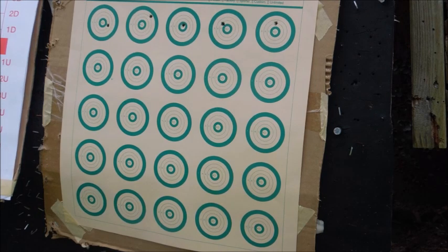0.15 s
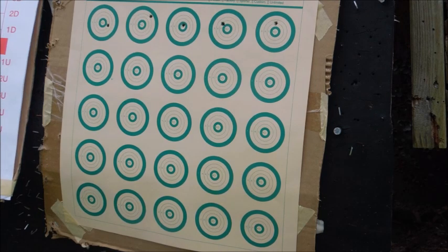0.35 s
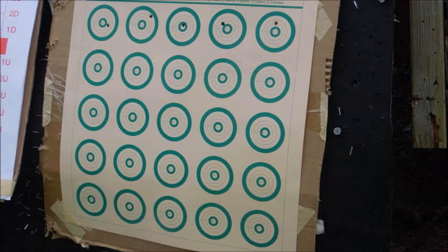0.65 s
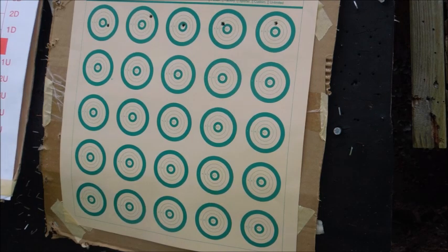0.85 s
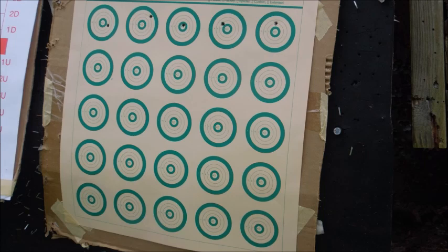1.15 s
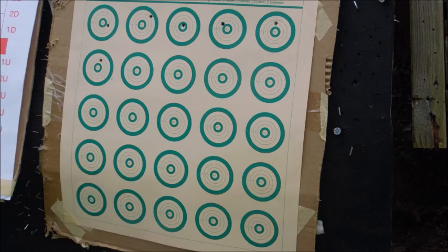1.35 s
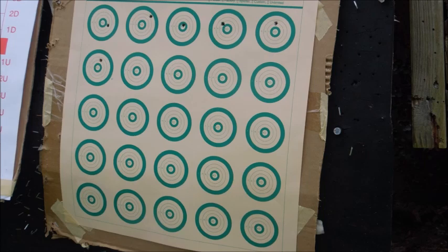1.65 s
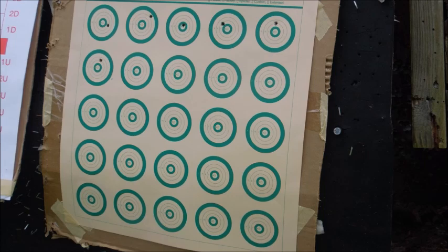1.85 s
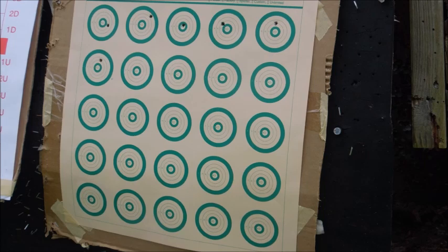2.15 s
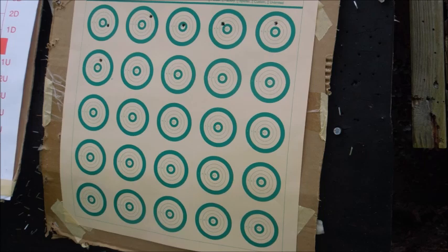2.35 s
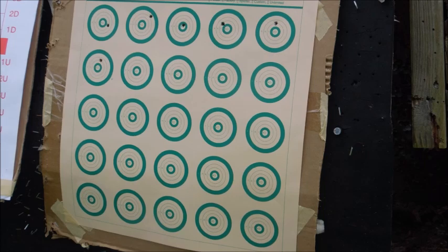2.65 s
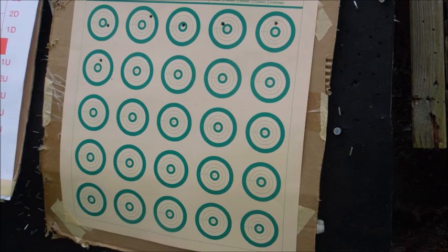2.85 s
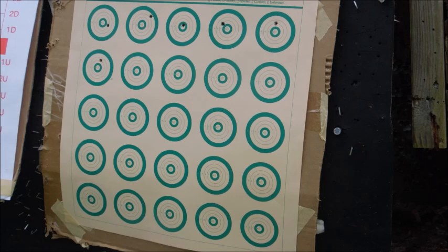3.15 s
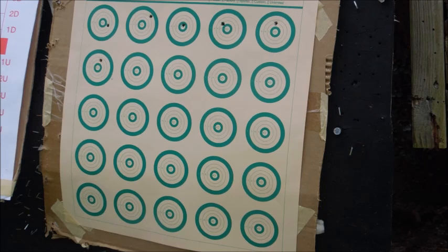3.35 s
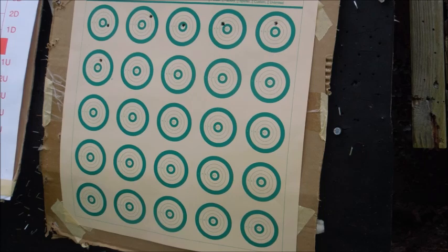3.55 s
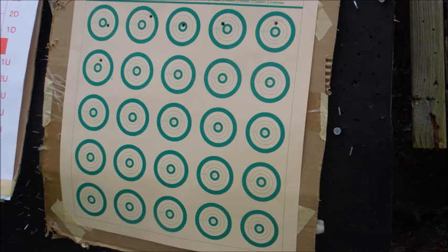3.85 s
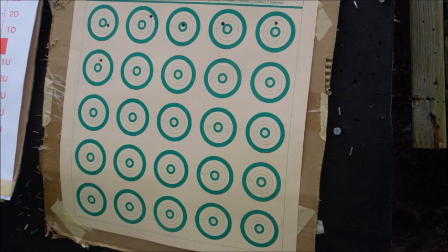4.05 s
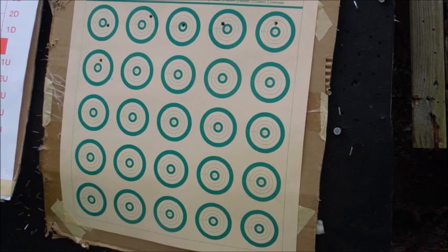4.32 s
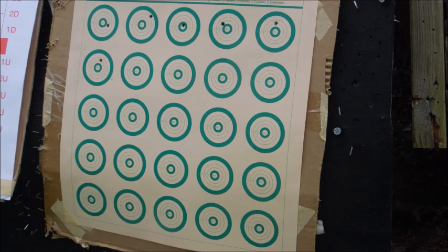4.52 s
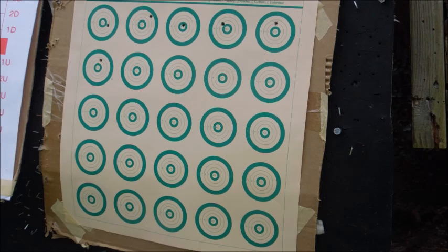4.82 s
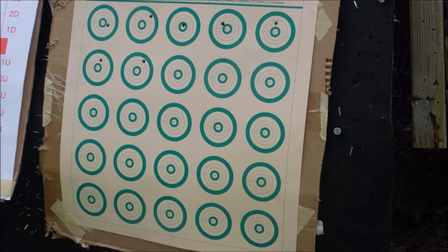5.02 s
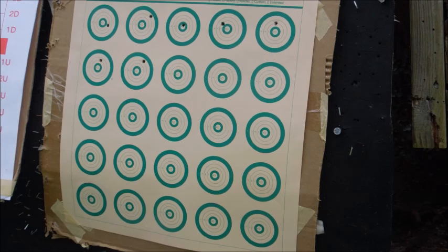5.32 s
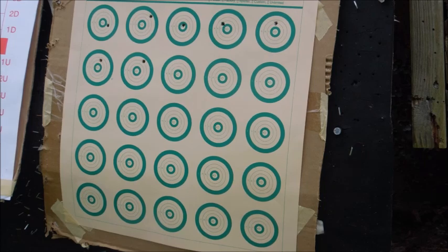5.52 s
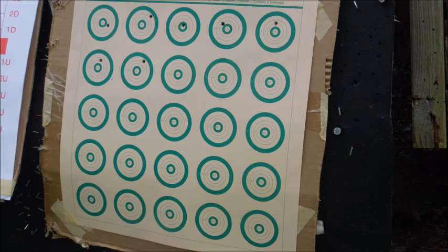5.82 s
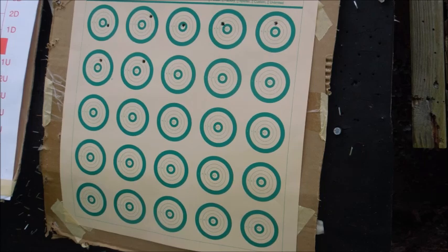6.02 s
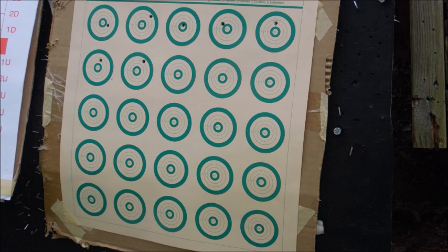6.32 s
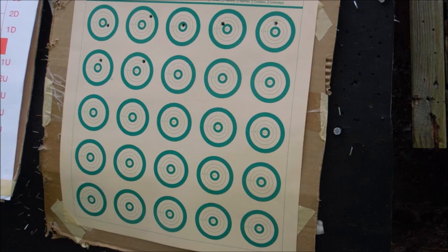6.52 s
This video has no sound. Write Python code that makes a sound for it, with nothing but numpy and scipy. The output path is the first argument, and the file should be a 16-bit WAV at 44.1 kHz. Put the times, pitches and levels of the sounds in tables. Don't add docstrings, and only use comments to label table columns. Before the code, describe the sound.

Two pellets crack hard into a paper target beside the microphone, echoing off nearby trees, while crickets chirp and gusty wind rumbles between brief dropouts.

```python
import sys
import numpy as np
from scipy import signal
from scipy.fft import rfft, irfft, next_fast_len
from scipy.io import wavfile
from scipy.ndimage import uniform_filter1d, map_coordinates

SR = 44100
rng = np.random.default_rng(int(sys.argv[2]) if len(sys.argv) > 2 else 0)


def generate_wav(signal):
    frames = np.transpose(np.atleast_2d(signal))
    scaled = np.clip(frames, -1, 1) * 32767
    pcm = np.round(scaled).astype(np.int16)
    wavfile.write(sys.argv[1], SR, pcm)


def attenuation_scalar(level_db):
    decades = np.asarray(level_db, float) / 20
    return 10 ** decades


N = 294579
T = np.arange(N) / SR

# start in seconds, end in seconds.
VIEWS = [(0, .687), (.7495, 2.422), (2.487, 3.89), (3.955, 6.561), (6.624, 6.7)]
# start in seconds, length in seconds.
FADES = [(.7495, 0.62), (2.487, 0.5), (3.955, 0.98), (6.624, 1)]
DUCK_DB, DUCK_HOLD_S, DUCK_RELEASE_S = -4.5, .55, .27

# frequency in Hz, level in dB.
RUMBLE = [(8, -30.5), (25, -0.5), (45, 0.5), (85, -7.5), (130, -38), (400, -120)]
FLUTTER = [(40, -120), (70, -6.5), (100, -1.5), (150, -4), (220, -10), (320, -20.5), (500, -38.5),
           (1200, -120)]
# start in seconds, level in dB, flutter over rumble in dB.
BREEZE = [(0, -42, -7.5), (.53, -44.5, -8.5), (.72, -50, -2), (1.47, -47, -4), (2.45, -45.5, -8),
          (3.93, -41.5, -9.5), (5.1, -34, -5), (5.6, -43, -8), (6.6, -55, -10)]
BREEZE_PAN_DB = 2
# start in seconds, hold in seconds, level in dB, flutter over rumble in dB, left over right in dB.
GUSTS = [(.0, .08, -37.5, -3.5, -8.5), (0.155, .1, -35.5, -8, 12), (.36, .14, -38, -9, 3),
         (2.63, .1, -42.5, 4.5, 7.5), (2.78, 0.44, -39, -4, 2.5), (3.26, .1, -42.5, 4, 3),
         (3.411, .06, -32.5, -5, 12), (3.598, .05, -40.5, -3, 9.5), (4.44, .04, -41.5, 3, 5.5),
         (4.515, 0.028, -38.5, 2.5, 5), (4.685, .21, -37.5, 4.5, 4.5), (4.92, .06, -39.5, -8.5, 2.5),
         (5.45, .06, -37, -6.5, 8), (6.053, 0.026, -43, 5, 11), (6.163, .04, -42.5, -6.5, 9),
         (6.4, .145, -44, 8, -0.5)]
GUST_RISE_DB_PER_S, GUST_FALL_DB_PER_S = 500, 260.5
# centre in seconds, pitch in Hz, level in dB, half length in seconds.
EDDIES = [(2.632, 187, -23, 0.0095), (2.698, 145.3, -35, 0.046), (2.78, 130.2, -32, .04),
          (2.87, 125.8, -27, 0.033), (3.004, 104.2, -33, 0.079), (3.154, 137.9, -29, 0.031),
          (3.336, 127.1, -33.5, 0.042), (3.447, 109.6, -21, 0.014), (3.618, 137.4, -36.5, 0.033)]

# frequency in Hz, level in dB.
ECHO_LOW = [(300, -120), (500, -21.5), (1100, -11), (1900, -2.5), (3100, -0.5), (3800, -10), (4500, -39),
            (8000, -120)]
ECHO_LATE = [(300, -120), (500, -18.5), (1100, -4.5), (2100, -2.5), (2900, -7.5), (3700, -15), (4500, -44),
             (8000, -120)]
ECHO_MIDDLE = [(2500, -120), (3800, -8), (4500, 0), (6200, -1), (7600, -7), (8800, -12), (12000, -120)]
ECHO_HIGH = [(6000, -120), (8200, -4), (9500, 2.5), (13000, -4.5), (20000, -13.5)]
# shot in seconds, level in dB, cut in seconds.
ANSWERS = [
    (-1.03, -1.5, .7),
    (1.45, 0, 2.44),
    (5.0783, -1, 6.58),
]
TRAP_S, TRAP_RISE_S, TRAP_HOLD_S, TRAP_FALL_DB_PER_S = .063, .028, .029, 285
TREES_S = .19
# trap in dB, trees in dB, trees rise in seconds, trees fall in dB per second.
VOICES = [
    (-23.5, -33, 0.062, 21.5),
    (-26.5, -36, 0.022, 46.5),
    (-24.5, -31.5, 0.033, 132.5),
]
# delay in seconds, level in dB, half length in seconds.
CLUMPS = [
    (0.303, 1, 0.012),
    (0.472, 1.5, 0.023),
    (0.388, -2, 0.053),
]

# frequency in Hz, level in dB.
CHOIR = [(5000, -120), (6200, -19), (6800, -6.5), (7500, -3), (8000, -2.5), (8600, -18.5), (10000, -120)]
# first chirp in seconds, last in seconds, period in seconds, pitch in Hz, level in dB.
FAR = [(.03, .69, .0353, 8150, -43), (.774, 1.46, .0345, 8240, -39.5), (2.078, 2.42, .035, 8230, -43),
       (2.511, 3.89, .0343, 8240, -39.5), (3.972, 5.08, .0341, 8240, -40.5),
       (6.022, 6.56, .0342, 8230, -43), (.012, .69, .0525, 7820, -41), (.76, 6.68, .0585, 7880, -46),
       (.02, 6.68, .047, 7150, -50)]
DUTY = .33
# frequency in Hz, level in dB.
AIR = [(100, -120), (250, -10.5), (400, -15.5), (600, -15.5), (1300, -19), (5700, -22), (9000, -21.5),
       (14000, -25.5), (20000, -28)]

# delay after the shot in seconds, peak in dB.
CLAPS = [(0.2741, -21), (.2945, -14), (.333, -23), (.408, -24), (.436, -24), (0.491, -25), (.517, -29),
         (.567, -27)]
CLAP_HZ, CLAP_T60 = 2160, .0069
# time in seconds, peak in dB, resonance in Hz.
CHIPS = [(1.5607, -14, 10500), (1.6672, -21, 6500), (1.67, -19, 5000), (1.6755, -19, 11500),
         (1.6793, -7, 10000), (1.6838, -8, 10000), (1.6865, -15, 7000), (1.6915, -17, 4500),
         (5.2868, -12, 7500), (5.2965, -17, 4000), (5.2925, -22, 8000), (5.296, -7, 10000),
         (5.3008, -10, 10000), (.445, -37, 4480), (.451, -31, 9500), (.453, -34, 3600), (.4545, -30, 10600),
         (.4577, -30, 9800)]
CHIP_T60 = .006
# time in seconds, peak in dB.
TICKS = [(.0965, -37), (.16, -40), (.368, -36), (.449, -24), (6.323, -33), (6.355, -41), (6.534, -41)]
TICK_HZ, TICK_T60 = 10700, .045
# time in seconds, peak in dB.
THUDS = [(1.68, -38), (1.93, -44), (5.18, -40), (5.29, -41), (4.455, -39), (4.52, -31), (4.705, -32),
         (6.075, -29.5), (6.445, -32)]
THUD_HZ, THUD_T60 = 208, .02

# first stroke in seconds, last in seconds, strokes, level in dB,
# share of strokes with a wing hitch.
NEAR = [(.819, 1.399, 9, -36.5, .15), (1.621, 2.3563, 11, -37, .7), (2.508, 2.7409, 4, -30.5, 0),
        (2.8148, 3.0396, 4, -30.5, 0), (3.1185, 3.421, 5, -30.5, .15), (3.4883, 3.8487, 6, -30.5, .15),
        (3.999, 4.4951, 8, -32, .25), (4.5663, 4.7151, 3, -31.5, .6), (4.7961, 5.0204, 4, -31, .6),
        (5.241, 5.8946, 10, -31, .6), (5.9677, 6.4845, 8, -30.5, .9)]
# time in seconds, pitch in Hz.
STROKE = [(0, 7450), (.006, 7620), (.013, 7630), (.018, 7400), (.024, 6980)]
NEAR_JITTER_S, HITCH_DB, SMOOTH_DB = .001, 16, 2

# contact in seconds, level in dB, air push delay in seconds,
# push width at left in seconds, push width at right in seconds.
SHOTS = [
    (1.4598, 0, .0172, .0108, .0046),
    (5.0783, 0, .0152, .0098, .0048),
]
# time after contact in seconds, level in dB.
CARD = [(0, -2.5), (.0025, 1), (.0035, -8.5), (.0045, 6.5), (.008, 2), (.01, -15.5), (.03, -7), (.045, -19),
        (.07, -35.5)]
SPRAY = [(0, -0.5), (.008, 2.5), (.017, 10), (.03, 10), (.04, -0.5), (.05, -11.5), (.06, -18), (.075, -30),
         (.1, -64)]
# centre in Hz, width in Hz, level in dB.
CARD_MODES = [
    (2750, 1000, -3.5),
    (1450, 900, -12.5),
    (300, 270, -10.5),
]
# frequency in Hz, level in dB.
SPRAY_COLOUR = [(100, -33), (300, -9), (700, -7.5), (1500, -4), (2800, -12.5), (4000, -7.5), (6000, -4.5),
                (8000, -1.5), (12000, 3), (20000, -2.5)]

# time in seconds, level in dB, spread in seconds.
CRACKLE = [(2.4595, -62, .0001), (2.4745, -52, .0001), (2.4793, -20, .0002), (2.4824, 6, .0003),
           (2.4852, 6, .0007), (2.4867, -5, .0008), (2.4882, 6, .0005), (2.4913, 6, .0005),
           (2.4941, 6, .00022)]


def unit(x):
    return x / np.sqrt(np.mean(x ** 2) + 1e-20)


def along(points, hz):
    f, v = np.transpose(points)
    return np.interp(np.log(hz + 1), np.log(f + 1), v)


def curves(rows, t=T):
    s, *cols = np.transpose(rows)
    return [np.interp(t, s, c) for c in cols]


def wobble(rate):
    knots = rng.standard_normal(int(N * rate / SR) + 4)
    return map_coordinates(knots, [T * rate])


def filtered(x, response):
    count = x.shape[-1]
    m = next_fast_len(count + min(count, SR))
    return irfft(rfft(x, m) * response(np.fft.rfftfreq(m, 1 / SR)), m)[..., :count]


def rush(spectrum, alike, count=N, alike_high=None):
    points = [(2500, alike), (11000, alike if alike_high is None else alike_high)]

    def response(hz):
        turn = np.arccos(np.clip(along(points, hz), -1, 1)) / 2
        return attenuation_scalar(along(spectrum, hz)) * [np.cos(turn), np.sin(turn)]

    mid, side = filtered(rng.standard_normal((2, count)), response)
    return unit(np.array([mid + side, mid - side]))


def add(track, s, sound):
    part = track[..., round(s * SR):][..., :sound.shape[-1]]
    part += sound[..., :part.shape[-1]]


def wind(gain_db):
    starts, levels, edges = np.transpose(BREEZE)
    now = np.searchsorted(starts, T, side="right").clip(1) - 1
    pan = attenuation_scalar([[BREEZE_PAN_DB / 2], [-BREEZE_PAN_DB / 2]])
    breeze = attenuation_scalar(levels[now] + gain_db + 2.2 * wobble(11)) * pan
    rumble = breeze ** 2
    flutter = (breeze * attenuation_scalar(edges[now])) ** 2
    for s, hold, db, edge_db, pan_db in GUSTS:
        rise_db = GUST_RISE_DB_PER_S * np.clip(s - T, 0, 1)
        fall_db = GUST_FALL_DB_PER_S * np.clip(T - s - hold, 0, 1)
        power = (attenuation_scalar(db - rise_db - fall_db) * attenuation_scalar([[pan_db / 2], [-pan_db / 2]])) ** 2
        rumble = rumble + power
        flutter = flutter + power * attenuation_scalar(2 * edge_db)
    lumps = attenuation_scalar(4.2 * np.array([wobble(25), wobble(25)]))
    gusts = np.sqrt(rumble) * rush(RUMBLE, .1)
    gusts = gusts + np.sqrt(flutter) * unit(lumps * rush(FLUTTER, .078))
    swell = sum(attenuation_scalar(db) * np.exp(-((T - s) / half) ** 2) for s, _, db, half in EDDIES)
    pitch = curves(EDDIES)[0] * (1 + .13 * wobble(35))
    phase = 2 * np.pi * np.cumsum(pitch) / SR
    return gusts + swell * attenuation_scalar(1.6 * wobble(28)) * np.sin(phase) * attenuation_scalar([[3], [-11]])


def echoes():
    out = np.zeros((2, N))
    early, late = rush(ECHO_LOW, 1.0), rush(ECHO_LATE, .87)
    middle, high = rush(ECHO_MIDDLE, .7), rush(ECHO_HIGH, .56)
    grain = attenuation_scalar(1.7 * wobble(260))

    def swell(age, rise, hold, fall):
        return np.clip(age / rise, 0, 1) * attenuation_scalar(-fall * np.clip(age - rise - hold, 0, 9))

    for s, db, end in ANSWERS:
        age = T - s
        far = np.pi / 2 * np.clip((age - .26) / .45, 0, 1)
        clumps = attenuation_scalar(sum(gain * np.exp(-((age - delay) / half) ** 2) for delay, gain, half in CLUMPS))
        low = clumps * (np.cos(far) * early + np.sin(far) * late)
        trap = swell(age - TRAP_S, TRAP_RISE_S, TRAP_HOLD_S, TRAP_FALL_DB_PER_S)
        for (trap_db, trees_db, rise, fall), layer in zip(VOICES, (low, middle, high)):
            trees = swell(age - TREES_S, rise, 0, fall)
            level = np.hypot(attenuation_scalar(trap_db) * trap, attenuation_scalar(trees_db) * trees)
            out += (T < end) * attenuation_scalar(db) * level * layer
    return out * unit(grain)


def far_crickets():
    out = attenuation_scalar(-45.5 + 1.0 * wobble(32)) * rush(CHOIR, .3)
    for first, last, period, hz, db in FAR:
        chirp = DUTY * period
        t = np.arange(round(chirp * SR)) / SR
        starts = np.arange(first, last, period)
        luck = rng.standard_normal((200, 5))
        for s, (late, pitch, size, pan, lag) in zip(starts, luck):
            lags = np.array([[0], [.6 * lag]])
            phase = 2 * np.pi * hz * (1 + .005 * pitch) * (t - .6 * t * t) + lags
            level = attenuation_scalar(db + 1.5 * size + [[pan], [-pan]])
            add(out, abs(s + .0015 * late), level * np.sin(np.pi * t / chirp) * np.sin(phase))
    return out


def open_air():
    return attenuation_scalar(-47.0) * rush(AIR, .49, alike_high=.062)


def distant_hum():
    return attenuation_scalar(-64.5) * rush([(300, -120), (360, -23), (386, .5), (412, -19.5), (480, -120)], .99)


def ticks():
    out = np.zeros((2, N))
    t = np.arange(SR // 25) / SR
    puffs = [(s + delay, db, CLAP_HZ, CLAP_T60) for s, *_ in SHOTS for delay, db in CLAPS]
    puffs += [(s, db, hz, CHIP_T60) for s, db, hz in CHIPS]
    puffs += [(s, db, TICK_HZ, TICK_T60) for s, db in TICKS]
    puffs += [(s, db, THUD_HZ, THUD_T60) for s, db in THUDS]
    for s, db, hz, t60 in puffs:
        width = max(hz * min(.0065 / t60, 1), 170)
        decay = attenuation_scalar(-60 * t / t60) * (1 - np.exp(-30 * t / t60))
        puff = rush([(20, 0), (20000, 0)], .88, count=len(t)) * decay
        ring = filtered(puff, lambda f: (1j * f * width / (hz * hz - f * f + 1j * f * width)) ** 2)
        add(out, s, attenuation_scalar(db) * ring / np.abs(ring).max())
    return out


def near_cricket():
    out = np.zeros((2, N))
    t = np.arange(round(.026 * SR)) / SR
    strokes = [(s, db, share) for first, last, count, db, share in NEAR
               for s in np.linspace(first, last, count)]
    luck = rng.standard_normal((len(strokes), 6))
    dice = rng.random(len(strokes))
    for (s, db, share), (pace, tune, slip, bright, late, size), die in zip(strokes, luck, dice):
        depth_db = HITCH_DB if die < share else SMOOTH_DB
        pitch = curves(STROKE, t * (1 + .04 * pace))[0] * (1 + .005 * tune)
        phase = 2 * np.pi * np.cumsum(pitch) / SR
        attack = np.clip(t / .006, 0, 1) ** .7
        release = np.clip((.0245 - t) / .004, 0, 1) * attenuation_scalar(-130 * np.clip(t - .011, 0, 1))
        hitch = np.exp(-((t - .0178 - .001 * slip) / .0008) ** 2)
        octave = attenuation_scalar(-12 + 4 * bright) * (t / .022) ** 4 * np.sin(2 * phase)
        tone = np.sin(phase) + octave
        rasp = uniform_filter1d(rng.standard_normal(len(t)), size=5) * 2
        click = .017 * depth_db * hitch * np.sin(1.6 * phase) * rasp
        song = attack * release * attenuation_scalar(-depth_db * hitch) * tone + click
        level = attenuation_scalar(db + .07 + .44 * size) * attenuation_scalar([[-1.3], [1.3]])
        add(out, s - .0012 + NEAR_JITTER_S * late, level * song)
    return out


def shots():
    out, push = np.zeros((2, N)), np.zeros((2, N))
    t = np.arange(SR // 8) / SR

    def modes(f):
        return sum((-1) ** k * attenuation_scalar(db) * 1j * f * w / (c * c - f * f + 1j * f * w)
                   for k, (c, w, db) in enumerate(CARD_MODES))

    for s, db, delay, *widths in SHOTS:
        blow = rush([(20, 0), (20000, 0)], .93, count=len(t))
        card = unit(filtered(blow, modes)) * attenuation_scalar(curves(CARD, t)[0])
        spray = rush(SPRAY_COLOUR, .8, count=len(t), alike_high=.1) * attenuation_scalar(curves(SPRAY, t)[0])
        width = np.array(widths)[:, None]
        slug = np.clip((t - delay) / .001, 0, 1) * np.clip((delay + width - t) / (.5 * width), 0, 1)
        add(out, s, attenuation_scalar(db) * (card + spray) * attenuation_scalar(-19 * slug))
        add(push, s, -1.08 * slug)

    def coupling(hz):
        return -hz ** 2 / (1.92 ** 2 - hz ** 2 + 1j * 3.6 * hz)

    def sag(hz):
        return 1 - .38 / (1 + 1j * hz / .83)

    swing = filtered(filtered(push, coupling) - push, sag)
    return out + push + 3.4 * swing


def crackle_burst():
    t = np.arange(SR // 20) / SR + 2.455
    partials = [(7850, .3), (7000, .14), (8700, .2), (10500, .1), (13900, .14), (15400, .22)]  # Hz, amplitude
    tones = sum(a * np.sin(2 * np.pi * hz * t) for hz, a in partials)
    pulses = sum(attenuation_scalar(db) * np.exp(-np.abs(t - s) / spread) for s, db, spread in CRACKLE)
    spikes = sum(attenuation_scalar(db) * np.exp(-np.abs(t - s) / .00015) for s, db, _ in CRACKLE)
    spikes = spikes * np.diff(rng.standard_normal(len(t) + 2), 2)
    out = np.zeros((2, N))
    add(out[1], t[0], tones * pulses + .3 * spikes)
    return out


def field_level():
    fade = np.ones(N)
    for s, length in FADES:
        progress = np.clip((T - s) / length, 0, 9) + .03
        fade = np.where(T >= s - .03, np.tanh(progress ** 1.6 * 1.28) ** (1 / 1.44), fade)
    duck = sum((T > s) * np.clip((s + DUCK_HOLD_S + DUCK_RELEASE_S - T) / DUCK_RELEASE_S, 0, 1)
               for s, *_ in SHOTS)
    return 20 * np.log10(fade) + DUCK_DB * duck


def scene():
    gain_db = field_level()
    field = attenuation_scalar(gain_db) * (far_crickets() + near_cricket() + open_air())
    hum = attenuation_scalar(gain_db * .76) * distant_hum()
    return field + hum + wind(gain_db) + shots() + echoes() + ticks()


def low_pass(x):
    return signal.sosfilt(signal.butter(12, 16050, fs=SR, output="sos"), x)


def record(dry):
    limited = np.clip(dry, -1.02, 1.02)
    heard = filtered(limited, lambda hz: np.sin(np.pi / 2 * np.clip((14450 - hz) / 300, 0, 1)) ** 2)
    gate = np.zeros(N)
    for start, end in VIEWS:
        smear = attenuation_scalar(-58 - 5000 * np.clip(T - end, 0, .05))
        gate += (T >= start) * np.where(T < end, 1, smear) * (T < end + .03)
    mix = np.clip(heard * gate + crackle_burst(), -1, 1)
    return low_pass(mix)


dry = scene()
out = record(dry)
generate_wav(out)
```